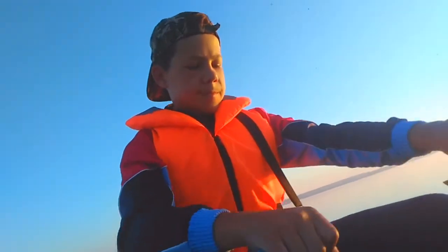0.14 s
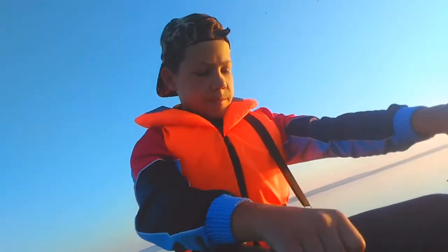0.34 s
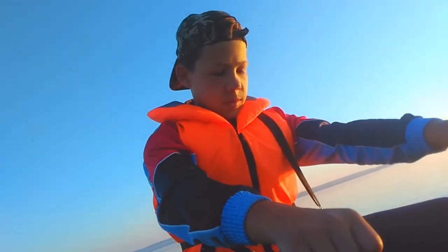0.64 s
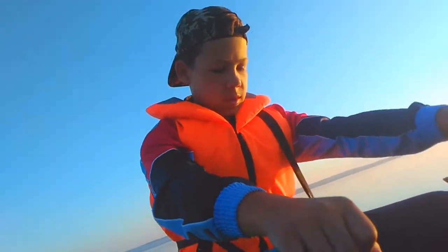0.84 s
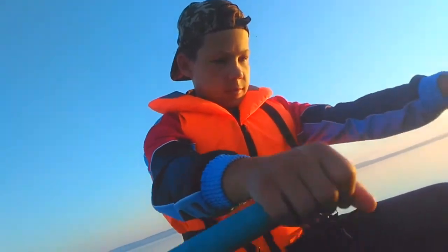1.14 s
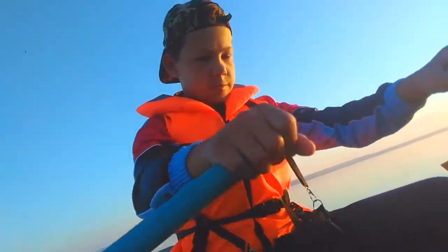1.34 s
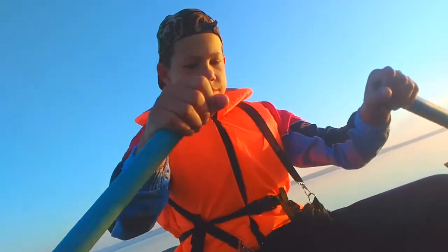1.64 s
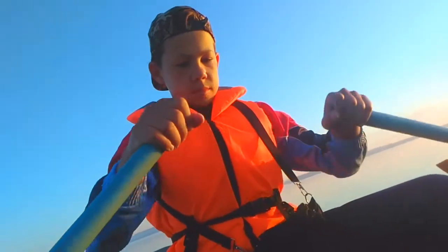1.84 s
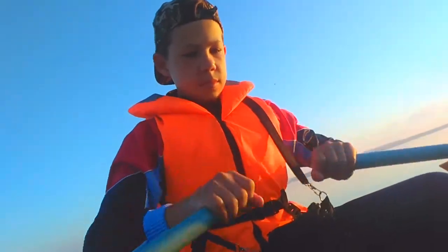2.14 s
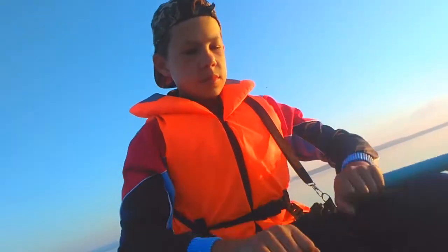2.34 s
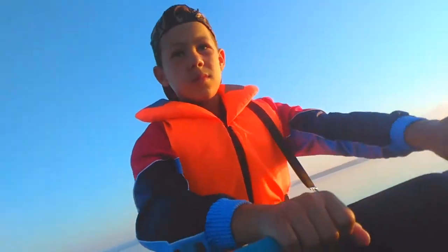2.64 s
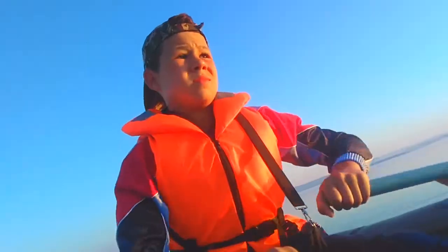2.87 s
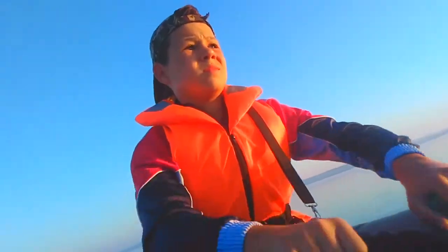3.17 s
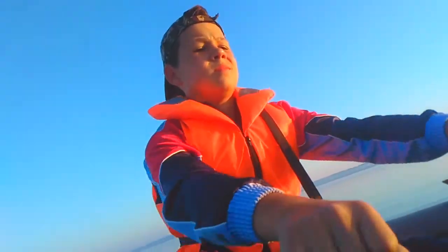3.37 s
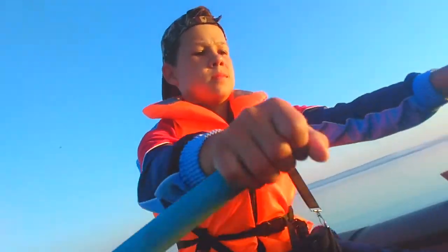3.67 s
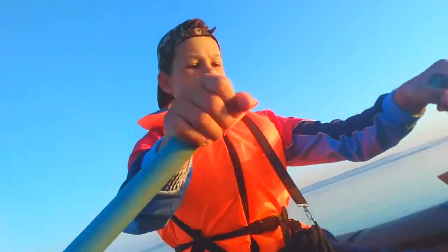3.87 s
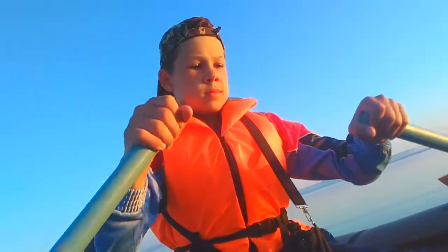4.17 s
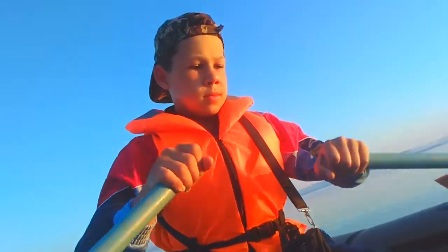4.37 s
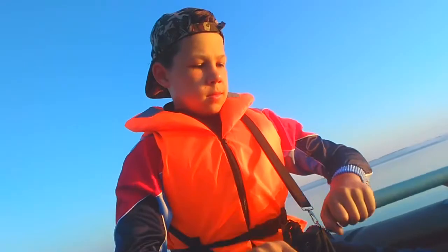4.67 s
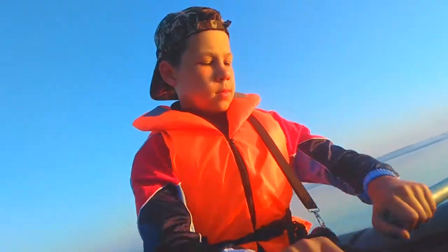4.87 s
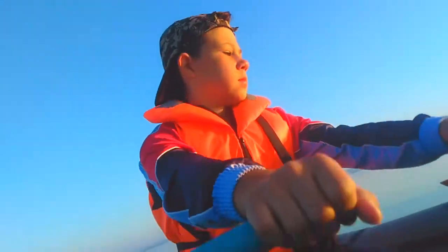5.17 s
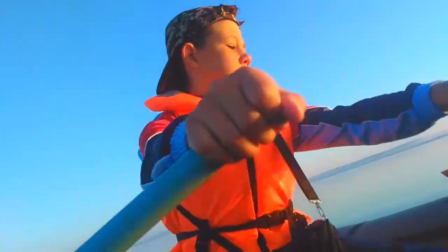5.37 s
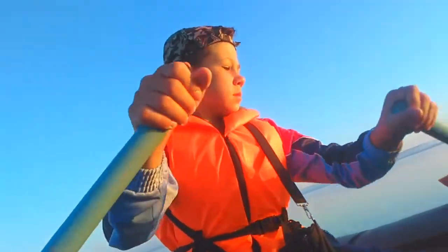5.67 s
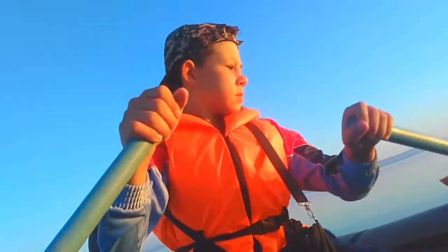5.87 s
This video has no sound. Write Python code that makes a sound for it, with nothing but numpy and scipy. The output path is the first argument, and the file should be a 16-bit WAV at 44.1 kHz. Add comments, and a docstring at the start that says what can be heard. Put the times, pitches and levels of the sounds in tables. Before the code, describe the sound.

Oars pull a small boat across a calm lake, blades splashing and gurgling close by, wooden knocks and faint squeaks between drips and runoff.

```python
"""On a calm lake, in a small rowing boat, heard close to the right oar: the blades splash, spray and churn.
Noise makes the rushing water and swarms of short rising tones its bubbles; drops and slaps are single sounds.
Oar knocks are sums of dying tones, the hull thumps on low tones and squeaks are thin gliding whistles.
A soft noise wash lies behind it all; there are a few dry ticks, and once the level drops almost to silence.
Table levels are relative: later filters and trims also set how loud each sound ends up."""
import sys
import numpy as np
from scipy import signal
from scipy.fft import rfft, irfft, next_fast_len
from scipy.io import wavfile
from scipy.ndimage import uniform_filter1d

SR = 44100
rng = np.random.default_rng(int(sys.argv[2]) if len(sys.argv) > 2 else 0)


def unload_wav(signal):
    """Save mono or channel-first audio to the path in sys.argv[1] as 16-bit WAV at rate SR, clipped to [-1, 1]."""
    wavfile.write(
        sys.argv[1],
        SR,
        np.round(np.clip(np.atleast_2d(signal).T, -1, 1) * 32767).astype(np.int16),
    )


N = 265041
TIME = np.arange(N) / SR
SHORT_TIME = TIME[:SR // 4]   # a quarter of a second, enough for any short burst


def from_db(db):
    """Turn decibels into a gain."""
    return 10 ** (np.asarray(db) / 20)


def rms_one(x):
    """Scale a sound to an rms of 1."""
    return x / np.sqrt(np.mean(x ** 2) + 1e-20)


def curve(rows):
    """Join (time, level) rows by straight lines in dB, as a gain at every sample."""
    return from_db(np.interp(TIME, *np.transpose(rows)))


def add(track, s, sound):
    """Mix a sound into a track at time s; a negative time means the very start."""
    at = max(int(s * SR), 0)
    track[at:at + len(sound)] += sound[:max(N - at, 0)]


def cut(x, hz, kind, order=2):
    """Keep only the low, high or middle band of a sound (Butterworth filter)."""
    safe_hz = np.clip(hz, 10, SR / 2 - 1000)
    sections = signal.butter(order, safe_hz, kind, fs=SR, output="sos")
    return signal.sosfilt(sections, x + 1e-18)


def colour(x, points):
    """Shape the spectrum with a minimum-phase filter, which never sounds ahead of its input."""
    size = 2 * next_fast_len(N // 2 + SR // 4, True)
    hz, db = np.transpose(points)
    bin_hz = np.arange(size // 2 + 1) * SR / size
    shape_db = np.interp(np.log(bin_hz + 1), np.log(hz), db)
    # keeping one half of the cepstrum and doubling it gives the minimum phase
    cepstrum = irfft(np.log(from_db(shape_db)), size)[:size // 2]
    response = np.exp(2 * rfft(cepstrum, size) - cepstrum[0])
    return irfft(rfft(x, size) * response, size)[:N]


def drift(rate):
    """Smooth random wandering with rms 1: straight lines between `rate` random points per second."""
    knots = rng.standard_normal(N // 50)
    return rms_one(np.interp(TIME * rate, np.arange(len(knots)), knots))


def even(x, span_s):
    """Hold the local power near 1 while grains shorter than the span keep their relative sizes."""
    size = max(int(span_s * SR), 2)
    power = uniform_filter1d(uniform_filter1d(x ** 2, size), size)
    return x / np.sqrt(np.abs(power) + np.mean(x ** 2) / 100)


def burst(t60):
    """Noise that starts at rms 1 and falls by 60 dB in t60 seconds."""
    return rng.standard_normal(len(SHORT_TIME)) * 1000 ** (-SHORT_TIME / t60)


def smear(x, echo):
    """Blur a sound with a burst of random reflections, scaled to unit energy."""
    return signal.fftconvolve(x, echo / np.sqrt(np.sum(echo ** 2)))[:N]


def echoes(x, wet_db, t60):
    """Add a short, dense spatter of softened reflections."""
    echo = cut(burst(t60), 3800, "low", order=1) * (1 - np.exp(-SHORT_TIME / 0.0073))
    return x + from_db(wet_db) * smear(x, echo)


def ports(x, left_db, left_lag_s, scatter, blur_hz):
    """Two channels of opposite polarity; the shaded left one hears treble mostly scattered by the boat."""
    scattered = smear(x, burst(0.093))
    direct = np.interp(TIME - left_lag_s, TIME, x)   # a negative lag lets the left lead
    left = cut(direct, blur_hz, "low", order=1) + scatter * cut(scattered, 1100, "high", order=1)
    return np.array([-from_db(left_db) * left, x])


def swell(s, attack, hold, release, db, swell_db_per_s=0):
    """Gain of one rush of water: it rises, reaches its level as the hold ends, then dies away."""
    t = TIME - s
    late = t - attack - hold
    shape_db = np.where(late < 0, swell_db_per_s * late, -60 * late / release)
    return np.clip(t / attack, 0, 1) ** 2 * from_db(db + shape_db)


def together(gains):
    """Unrelated rushes add in power."""
    return np.sqrt(sum(gain ** 2 for gain in gains))


BURST_OCTAVES = 0.83   # a rising bubble bursts around this far above its starting pitch


def bubble(hz, rise, t60, onset_cycles=0.45):
    """A pocket of air rings; its pitch climbs as it nears the surface, or sinks if rise is negative."""
    t = TIME[:int(min(t60, .2) * SR) + 2]
    octaves = np.minimum(rise * t, 2)
    pitch = np.minimum(hz * 2 ** octaves, SR / 3)
    bursting = 1 + np.maximum(octaves / BURST_OCTAVES, 0) ** 8
    decay = 1000 ** (-t / t60) / bursting
    onset = 1 - np.exp(-t * hz / onset_cycles)
    return np.sin(2 * np.pi * np.cumsum(pitch) / SR) * decay * onset


def swarm(count, low_hz, high_hz, cycles, climb, spread_db):
    """Bubbles of random size and strength, each ringing some cycles and climbing by up to some octaves."""
    out = np.zeros(N)
    for when, size, strength, life, lift, side in rng.random((count, 6)):
        hz = low_hz * (high_hz / low_hz) ** size
        t60 = cycles * 2 ** (2 * life - 1) / hz   # half to twice the usual life
        gain = from_db(-spread_db * np.log(strength + 0.0028)) * np.sign(side - .5)
        add(out, when * N / SR, gain * bubble(hz, lift * climb / t60, t60))
    return out


# colour of air and distant ripples: (frequency [Hz], level [dB per Hz])
LAKE_COLOUR = [(15, -34.5), (25, -10.5), (44, -2), (128, 9), (344, -17), (927, -6), (1240, -23.5),
               (2370, -21.5), (5010, -12), (6370, -24), (8100, -58.5), (9020, -28), (10300, -38),
               (15000, -36)]


def lake():
    """A faint wash of air and distant ripples from all around: coloured noise that wavers slightly."""
    near, around = (rms_one(colour(rng.standard_normal(N), LAKE_COLOUR)) for side in range(2))
    wash = ports(near, left_db=-11.0, left_lag_s=0.000009, scatter=3.3, blur_hz=900)
    wash = wash + from_db(-8.5) * around * [[1], [0]]   # extra, separate noise on the left
    return wash * from_db(-55.0 + 2 * drift(24))


# sharp, dry ticks: (time [s], level [dB], lowest frequency [Hz], highest frequency [Hz])
TICKS = [(0.12, -2.5, 5750, 8030), (1.392, -5, 5340, 7800), (2.7669, -23, 100, 14000)]


def tick():
    """Brief clicks, each a tiny noise burst in a band of its own, almost only on the right."""
    out = np.zeros(N)
    for s, db, low_hz, high_hz in TICKS:
        add(out, s, from_db(db) * cut(burst(0.0031), [low_hz, high_hz], "band", order=4))
    return np.array([from_db(-28) * out, out])


# an oar squeaking in its lock:
# (time [s], length [s], level [dB], start pitch [Hz], middle pitch [Hz], end pitch [Hz])
SQUEAKS = [(1.12, 0.075, -48.5, 5460, 5840, 5500), (1.197, 0.032, -36.5, 4700, 5240, 5060),
           (1.222, 0.045, -39, 5230, 5050, 4980), (1.268, 0.018, -38.5, 5200, 5420, 5300),
           (1.487, 0.032, -32.5, 5970, 5650, 4940), (1.546, 0.059, -36, 5760, 5250, 5320),
           (2.095, 0.085, -41.5, 5510, 5460, 5910), (2.13, 0.031, -36, 5050, 4820, 5200),
           (2.205, 0.026, -38, 4700, 5060, 5300), (4.418, 0.14, -65, 4860, 5350, 4620),
           (4.445, 0.022, -48.5, 4960, 5250, 5260), (5.357, 0.035, -43, 3830, 3480, 3860)]


def squeaks():
    """An oar turning in its lock rubs out thin whistles that glide, waver in pitch and flutter in level."""
    out, waver = np.zeros(N), drift(300)
    for s, length, db, start_hz, middle_hz, end_hz in SQUEAKS:
        u = np.linspace(0, 1, int(length * SR))
        glide = np.polyfit([0, .5, 1], [start_hz, middle_hz, end_hz], 2)
        pitch = np.polyval(glide, u) * (1 + 0.016 * waver[int(s * SR):][:len(u)])
        fade = np.abs(np.sin(np.pi * u)) ** .5
        add(out, s, from_db(db) * fade * np.sin(2 * np.pi * np.cumsum(pitch) / SR))
    flutter = from_db(3.5 * drift(200) - 3)
    heard = echoes(out * flutter, wet_db=-8, t60=.18)
    return ports(heard, left_db=-9.5, left_lag_s=.00007, scatter=1.0, blur_hz=9000)


# soft thumps: (time [s], level [dB], pitch [Hz], pitch rise [octaves/s], 60 dB decay [s])
THUMPS = [(0.807, -18, 180, -9, 0.15), (0.826, -11, 103.5, -7, 0.09), (0.986, -14.5, 200, -11, 0.085),
          (1.038, -46, 140, -5, 0.15), (1.244, -32, 169, 4.5, 0.18)]


def hull():
    """The hull gives under the stroke: low tones, most of them sagging in pitch, with a short echo."""
    out = np.zeros(N)
    for s, db, hz, rise, t60 in THUMPS:
        add(out, s, from_db(db) * bubble(hz, rise, t60))
    heard = echoes(out, wet_db=-13.5, t60=0.44)
    return ports(heard, left_db=-14, left_lag_s=-0.00015, scatter=0.33, blur_hz=3000)


# the far blade splashes:
# (time [s], attack [s], hold [s], 60 dB release [s], spray level [dB], wash level [dB])
FAR_SPLASHES = [(-0.03, 0.13, 0.18, 1, -41.5, -47.5), (0.341, 0.024, 0.051, 0.26, -43, -43),
                (0.416, 0.022, 0.022, 2.1, -46.5, -52), (0.69, 0.14, 0.23, 1.06, -47.5, -61),
                (1.415, 0.014, 0.069, 1, -42.5, -61), (2.096, 0.048, 0.11, .4, -48, -74),
                (2.463, 0.094, 0.023, 0.21, -32.5, -70), (3.46, 0.11, 0.2, 0.36, -51, -67.5),
                (3.85, 0.013, 0.065, 0.29, -48, -88), (5.078, 0.13, 0.034, 0.73, -43.5, -76),
                (5.33, 0.033, 0.29, .4, -55.5, -88)]
# colour of the far spray: (frequency [Hz], level [dB per Hz])
FAR_COLOUR = [(600, 10.5), (1500, -25), (3000, -3.5), (5500, 9), (7000, -0.5), (9000, -32), (12000, -45.5)]
# colour of splashing water, far and near: (frequency [Hz], level [dB per Hz])
SPLASH_COLOUR = [(500, -25), (800, -5), (1200, 1), (1700, 5), (2400, 6.5), (3300, -1), (5000, -55)]


def far_spray():
    """The far blade fizzes and washes: small bubbles blurred into noise, direct on the left."""
    fizz = swarm(count=4000, low_hz=800, high_hz=8000, cycles=20, climb=.3, spread_db=3.5)
    water = rms_one(cut(fizz, 3000, "high", order=1)) + from_db(-2) * rng.standard_normal(N)
    spray_level = together(swell(*shape, db) for *shape, db, _ in FAR_SPLASHES)
    wash_level = together(swell(*shape, db) for *shape, _, db in FAR_SPLASHES)
    sound = from_db(-6.0) * spray_level * even(colour(water, FAR_COLOUR), span_s=0.043)
    sound += wash_level * even(colour(water, SPLASH_COLOUR), span_s=0.055)
    heard = ports(sound, left_db=3.5, left_lag_s=0.0002, scatter=1.0, blur_hz=1500)
    return heard[::-1]   # swap sides: here the right is the shaded one


# a deep blade sheds a smooth, hollow swirl:
# (time [s], attack [s], hold [s], 60 dB release [s], level [dB])
SWIRLS = [(0.131, 0.023, 0.074, 0.21, -35), (0.343, 0.023, 0.065, 0.17, -33.5),
          (3.519, 0.04, 0.19, 0.16, -45.5), (3.621, 0.01, 0.022, 0.21, -36.5),
          (5.69, 0.022, 0.12, 0.22, -35)]
# the hollow of the swirl: (frequency [Hz], width [Hz], level [dB])
SWIRL_RESONANCES = [(135, 55, -6.5), (336, 95, 3.5), (452, 67, -4.5), (700, 200, -10.5), (977, 57, -11.5)]


def swirl():
    """Turbulence round a sunken blade sounds the hollow that it drags along: noise in a few narrow bands."""
    flow, hollow = rng.standard_normal(N), np.zeros(N)
    for hz, width, db in SWIRL_RESONANCES:
        band = cut(flow, [hz - width / 2, hz + width / 2], "band")
        hollow += from_db(db) * rms_one(band)
    level = together(swell(*row) for row in SWIRLS)
    sound = level * even(cut(hollow, 1200, "low", order=4), span_s=0.03)
    return ports(from_db(5.5) * sound, left_db=-9, left_lag_s=-0.00017, scatter=1.0, blur_hz=3000)


# a blade pushes water aside, with more bass the deeper it goes:
# (time [s], attack [s], hold [s], 60 dB release [s], gurgle level [dB], bass level [dB])
SURGES = [(0.082, 0.079, 0.026, 0.63, -22, -32.5), (0.271, 0.063, 0.079, 0.4, -23, -30),
          (0.386, 0.005, 0.06, 0.38, -18, -36), (0.488, 0.027, 0.016, 0.38, -23.5, -34.5),
          (0.726, 0.01, 0.32, 0.25, -36, -71), (0.979, 0.057, 0.015, 0.22, -46, -26),
          (1.215, 0.023, 0.043, 0.36, -44, -40), (1.452, 0.013, 0.028, 0.12, -18.5, -63),
          (1.542, 0.027, 0.064, 0.22, -33, -65), (1.667, 0.009, 0.0095, 0.66, -27, -30),
          (1.828, 0.015, 0.0077, 0.44, -25, -54), (2.469, 0.012, 0.011, 0.4, -27.5, -26.5),
          (2.59, 0.011, 0.0085, 0.08, -43, -26), (3.142, 0.14, 0.16, 0.18, -43.5, -56),
          (3.534, 0.069, 0.17, 0.36, -47, -39.5), (3.983, 0.021, 0.0094, 0.29, -63, -40),
          (4.114, 0.054, 0.022, 0.4, -27.5, -49), (5.588, 0.02, .02, 0.47, -32, -40),
          (5.678, 0.02, 0.044, 0.29, -23, -46), (5.745, 0.047, 0.078, 0.31, -32, -31.5)]
# colour of the churned water: (frequency [Hz], level [dB per Hz])
CHURN_COLOUR = [(40, -50.5), (70, 17), (130, 4.5), (220, -2.5), (370, -5.5), (600, -6), (900, -10),
                (1300, -14), (2500, -57.5)]
# between strokes the water laps at the hull
LAP_DB, LAP_BASS_DB, LAP_SWING_DB = -52, -57, 7


def churn():
    """The blades drag big air pockets under: low bubbles gurgle in turbulent, noisy water."""
    pockets = swarm(count=2400, low_hz=125.6, high_hz=1390, cycles=22.2, climb=0.33, spread_db=3.5)
    water = rms_one(cut(pockets, 260, "high", order=1)) + from_db(2) * rng.standard_normal(N)
    water = even(colour(water, CHURN_COLOUR), span_s=0.017)
    lap_db = LAP_SWING_DB * drift(7)
    gurgle_rushes = [swell(*shape, db) for *shape, db, _ in SURGES]
    bass_rushes = [swell(*shape, db) for *shape, _, db in SURGES]
    gurgle = together(gurgle_rushes + [from_db(LAP_DB + lap_db)])
    bass = together(bass_rushes + [from_db(LAP_BASS_DB + lap_db)])
    sound = gurgle * cut(water, 377, "high") - bass * cut(water, 247, "low")
    return ports(sound, left_db=-7, left_lag_s=-0.00031, scatter=0.87, blur_hz=2990)


NEAR_BLADE_LAG_S = 0.00035   # sound from the near blade reaches the left this much later
MIST_DB, TRICKLE_DB = -67, -62.5   # the fizz and the trickle that linger between splashes
RUNOFF_ATTACK_S, RUNOFF_RELEASE_S, SPLASH_ATTACK_S = 0.017, 0.38, 0.016
SPLASH_SWELL_DB_PER_S, SPRAY_SWELL_DB_PER_S = 20.5, 48   # the stream breaks into ever finer drops
# a lifted blade streams and drips, for spray() and splash():
# (time [s], length [s], final splash level [dB], final spray level [dB])
RUNOFFS = [(-0.02, 0.2, -29.5, -33.5), (1.541, 0.17, -31.5, -34.5), (2.116, 0.45, -27, -30.5),
           (2.785, 0.43, -29.5, -35.5), (3.899, 0.18, -40.5, -42), (4.625, 0.11, -37.5, -45.5),
           (4.763, 0.11, -32.5, -40.5), (4.889, 0.12, -36.5, -32)]
# the near blade throws short splashes, for spray() and splash():
# (time [s], hold [s], 60 dB release [s], splash level [dB], spray level [dB])
SPLASHES = [(-0.02, 0.016, 0.27, -28, -33.5), (0.137, 0.032, 0.3, -25.5, -47),
            (0.379, 0.06, 0.32, -33, -39), (0.561, 0.092, 0.9, -47, -50.5), (1.029, 0.02, 0.28, -45, -45.5),
            (1.337, 0.091, 0.16, -70, -48.5), (1.449, 0.018, 0.2, -36, -35),
            (1.777, 0.017, 0.087, -23.5, -33.5), (1.842, 0.024, 0.18, -35.5, -46),
            (1.929, 0.14, 0.23, -50, -55.5), (2.455, 0.02, 0.099, -42, -37),
            (2.827, 0.069, 0.073, -58, -42.5), (3.181, 0.095, 0.32, -49, -31.5),
            (3.362, 0.0096, 0.56, -46.5, -44), (4.153, 0.016, 0.21, -38, -37),
            (4.289, 0.015, 0.35, -49, -81), (5.072, 0.0071, 0.48, -37, -35),
            (5.315, 0.072, 0.051, -82, -44.5), (5.509, 0.037, 0.27, -47.5, -38.5),
            (5.562, 0.069, 0.13, -33.5, -30), (5.677, 0.026, 0.63, -38, -42.5),
            (5.792, 0.041, 0.063, -43.5, -46.5)]
# colour of the fine spray: (frequency [Hz], level [dB per Hz])
SPRAY_COLOUR = [(1800, -32), (2800, -4.5), (4200, 0.5), (5600, 2.5), (6800, 3), (8000, -3.5), (9300, -8),
                (11000, -97), (15000, -45)]


def spray():
    """Fine droplets and tiny bubbles fizz densely; as the spray thins only a smooth hiss is left."""
    fizz = swarm(count=6500, low_hz=2500, high_hz=8500, cycles=38, climb=.3, spread_db=4.2)
    rushes = [from_db(MIST_DB)]
    for s, length, _, db in RUNOFFS:
        rushes.append(swell(s, RUNOFF_ATTACK_S, length, RUNOFF_RELEASE_S, db, SPRAY_SWELL_DB_PER_S))
    for s, hold, release, _, db in SPLASHES:
        rushes.append(swell(s, SPLASH_ATTACK_S, hold, release, db))
    level = together(rushes)
    graininess = level / (level + from_db(-54))
    water = graininess * rms_one(fizz) + from_db(-5) * rng.standard_normal(N)
    clumps = from_db(2.5 * graininess * drift(90))
    sound = from_db(-1.5) * level * clumps * even(colour(water, SPRAY_COLOUR), span_s=0.025)
    return ports(sound, left_db=-20.5, left_lag_s=NEAR_BLADE_LAG_S, scatter=0.47, blur_hz=3000)


def splash():
    """Water off the near blade traps bubbles that chirp upwards; a thrown splash blurs them into a wash."""
    drops = swarm(count=5200, low_hz=600, high_hz=3400, cycles=38, climb=.55, spread_db=4.0)
    stream = together([swell(s, RUNOFF_ATTACK_S, length, RUNOFF_RELEASE_S, db, SPLASH_SWELL_DB_PER_S)
                       for s, length, db, _ in RUNOFFS])
    thrown = together([swell(s, SPLASH_ATTACK_S, hold, release, db) for s, hold, release, db, _ in SPLASHES])
    trickle = from_db(TRICKLE_DB)
    level = together([stream, thrown, trickle])
    graininess = together([stream, thrown / 2, trickle]) / (level + from_db(-58))
    wash = from_db(-4.5) * rng.standard_normal(N) * from_db(3.2 * drift(260))
    water = graininess * rms_one(cut(drops, 1200, "high", order=1)) + wash
    sound = from_db(-3.0) * level * even(colour(water, SPLASH_COLOUR), span_s=0.027)
    return ports(sound, left_db=-16.5, left_lag_s=NEAR_BLADE_LAG_S, scatter=0.68, blur_hz=4440)


# an oar knocks in its lock: (time [s], body level [dB], metallic top level [dB],
# top ring time [times the mode's], top pitch [times the mode's])
KNOCKS = [(0.962, -11, -14, 1.8, 0.74), (1.0131, -4.5, -3, 1.01, 0.99), (1.6734, -6, 5, 1.26, .995)]
# ringing modes of oar and lock: (frequency [Hz], level [dB], 60 dB decay [s])
OAR_MODES = [(328, -8, 0.05), (660, -3, 0.035), (785, -8.5, 0.024), (875, -11.5, 0.09), (1157, -19, 0.0099),
             (1382, 4, 0.014), (1622, -2, 0.019), (1785, -3.5, 0.028), (3336, -12.5, 0.0094),
             (3590, -17, 0.036), (4494, -2.5, 0.014), (5294, -11.5, 0.026), (6010, -3.5, 0.0066),
             (6690, -6, 0.0049), (6740, -26.5, 0.011), (7800, -23.5, 0.007)]


def oarlocks():
    """A hard knock rings the shaft's low modes and the lock's high ones, with a crack and a dull hull tail."""
    out = np.zeros(N)
    for s, body_db, top_db, top_ring, top_pitch in KNOCKS:
        for k, (hz, level_db, t60) in enumerate(OAR_MODES):
            if hz < 2600:   # the shaft
                db, life, pitch = body_db, t60, hz
            else:           # the lock
                db, life, pitch = top_db, t60 * top_ring, hz * top_pitch
            ring = np.sin(2 * np.pi * pitch * SHORT_TIME) * from_db(-60 * SHORT_TIME / life)
            add(out, s, (-1) ** k * from_db(db + level_db) * ring)
        crack = cut(burst(.022 * top_ring), [3300 * top_pitch, 6700 * top_pitch], "band", order=5)
        thud = cut(burst(.02), [600, 1900], "band")
        tail = cut(burst(.1), [200, 1900], "band")
        add(out, s, from_db(top_db - 4.5) * crack)
        add(out, s, from_db(body_db + 9.0) * thud)
        add(out, s, from_db(body_db - 3.0) * tail)
    soft_top = cut(out, 8000, "low", order=3)
    return ports(soft_top, left_db=-6.5, left_lag_s=-0.00026, scatter=0.22, blur_hz=4000)


SPLAT_ONSET_S = .0012


def splat(t60):
    """Water meeting water: noise that swells for an instant and dies away."""
    return burst(t60) * (1 - np.exp(-SHORT_TIME / SPLAT_ONSET_S))


DRIP_RISE_OCTAVES_PER_S, DRIP_RISE_SPREAD_OCTAVES_PER_S = 8, 6
DRIP_IMPACT_DB, DRIP_IMPACT_T60_S = -0.5, 0.012   # the splat as a drop lands, level relative to its ring
BUBBLE_FLUTTER_DB = 2.2   # moving water jostles the ringing bubbles
# hull, rower and water scatter each sound into a brief spatter
SPATTER_DB, SPATTER_ONSET_S, SPATTER_T60_S = -7, 0.0048, 0.041
# air pockets large and small glug, chirp and plink:
# (time [s], level [dB], pitch [Hz], pitch rise [octaves/s], 60 dB decay [s])
BUBBLES = [(0.155, -17.5, 384.7, 0, 0.22), (0.3564, -14, 564, 10, 0.031), (0.48, -20.5, 984, 4.5, 0.13),
           (0.517, -16, 634, 5.5, 0.07), (0.5485, -15.5, 395, -10, 0.07), (0.712, -27, 522, -13, 0.085),
           (1.4129, -25.5, 885, 40.5, 0.069), (1.463, -23.5, 436, 1, 0.14), (1.47, -23.5, 636, -0.5, 0.18),
           (1.606, -26.5, 384, -5, 0.22), (1.8361, -5, 483, -2, 0.069), (1.861, -18.5, 449, 15.5, 0.092),
           (0.269, -27.5, 1555, -8.5, 0.15), (0.58, -35.5, 1434, 2, 0.2), (0.58, -27, 740, 0, 0.065),
           (0.519, -24.5, 1380, -9, 0.054), (1.905, -26.5, 2780, 13, 0.027), (2.425, -22, 3740, 23, .015),
           (2.54, -22.5, 724, -3, 0.088), (3.181, -22, 2330, 8, .025), (4.598, -27.5, 2590, 1, 0.026),
           (4.719, -30, 3320, 11, 0.029), (5.154, -31, 845, 9, 0.035), (5.891, -34, 1900, -7, 0.057),
           (1.893, -24, 732, 24, 0.15), (2.1518, -18.5, 1048, 31, 0.041), (2.334, -27, 585, 3, 0.2),
           (2.601, -12, 360, -8.5, 0.048), (2.808, -32, 684, 29, 0.025), (2.936, -35.5, 680, 18.5, 0.2),
           (3.006, -30, 1374, 17.5, 0.042), (2.945, -37.5, 444, 7, 0.69), (3.11, -32.5, 620, 12.5, 0.084),
           (3.2379, -19, 1108, 18.5, 0.074), (3.291, -23.5, 1046, 8.5, 0.067),
           (3.919, -34.5, 824, -3, 0.055), (4.07, -33, 830, 4.5, 0.054), (4.146, -28, 363, -2.5, 0.24),
           (4.171, -24, 325, 0, 0.17), (4.2084, -21.5, 285, 0, 0.23), (4.258, -16, 360, 5, 0.046),
           (4.259, -15.5, 586, 21.5, 0.12), (4.576, -22, 658, 39, 0.078), (4.596, -25, 510, 22.5, 0.13),
           (4.815, -32, 596, 12, 0.17), (4.9234, -27, 1078, 7.5, 0.22), (5.5818, -22, 1125, 50, 0.28),
           (5.698, -20.5, 335, 6, 0.17), (5.715, -26, 789, -1.5, 0.15), (5.798, -21, 1113, -6.5, 0.029),
           (5.807, -20, 240, -1.5, 0.16), (5.838, -21.5, 375, -3.5, 0.14), (5.878, -26.5, 656, 33, 0.045),
           (5.8807, -23, 920, 17, 0.076)]
# the loudest drops plink: (time [s], level [dB], pitch [Hz], 60 dB decay [s])
DRIPS = [(0.009, -15.5, 3520, 0.0081), (0.0189, -15.5, 2130, 0.017), (0.0504, -18, 1780, 0.064),
         (0.058, -19, 1233, 0.091), (0.077, -19, 2910, 0.036), (0.125, -8.5, 2320, 0.0078),
         (0.19, -17, 2600, 0.019), (0.2018, -12, 1560, 0.016), (0.264, -18.5, 5600, 0.013),
         (0.351, -21, 2490, 0.011), (0.389, -9, 1630, 0.014), (0.4823, -13.5, 4740, 0.012),
         (1.597, -17, 1440, 0.031), (1.735, -15, 1170, 0.035), (1.7883, -3, 1060, 0.0097),
         (1.8023, -19, 6400, 0.015), (2.1098, -22, 2355, 0.021), (2.1801, -14, 2900, 0.026),
         (2.1993, -10, 3100, 0.0096), (2.217, -21.5, 970, 0.043), (2.267, -14.5, 1680, 0.027),
         (2.2773, -19.5, 974, 0.051), (2.294, -18.5, 5600, 0.0061), (2.327, -20.5, 1450, 0.048),
         (2.328, -16, 6730, 0.0055), (2.3769, -17.5, 1740, 0.033), (2.413, -17, 2700, 0.029),
         (2.471, -8.5, 4360, 0.01), (2.487, -11, 3020, 0.014), (2.516, -18.5, 1142, 0.039),
         (2.5466, -21, 3260, 0.012), (2.558, -17.5, 1830, 0.035), (2.582, -16, 1243, 0.055),
         (2.589, -8, 3620, 0.0082), (2.6465, -24, 1830, 0.038), (2.8153, -24, 1535, 0.049),
         (2.838, -23, 5140, 0.01), (2.848, -16.5, 2470, 0.018), (2.882, -24, 2800, 0.018),
         (2.9363, -22, 1940, 0.0075), (2.9802, -21, 2050, 0.022), (2.982, -15.5, 3980, 0.0081),
         (3.026, -26, 700, 0.027), (3.062, -21.5, 1790, 0.035), (3.092, -12, 2285, 0.022),
         (3.172, -18, 4000, 0.01), (3.196, -26, 1060, 0.033), (3.2153, -15, 2580, 0.019),
         (3.222, -20.5, 1140, 0.03), (3.239, -13.5, 6200, 0.0045), (3.2844, -8.5, 7320.0, 0.0068),
         (3.3125, -13.5, 5840, 0.0069), (3.34, -34, 1680, 0.027), (3.382, -25, 2340, 0.04),
         (3.5987, -25, 5530, 0.014), (3.8704, -21, 3980, 0.0084), (3.999, -19.5, 2390, 0.013),
         (4.039, -11, 4610, 0.012), (4.1475, -22.5, 1440, 0.042), (4.1865, -18, 1480, 0.01),
         (4.566, -29.5, 5630, 0.011), (4.6064, -26.5, 5940, 0.0096), (4.661, -24, 3800, 0.0072),
         (4.783, -11, 1730, 0.004), (4.7937, -13, 1665, 0.015), (4.8141, -17, 1780, 0.016),
         (4.8319, -14, 1217, 0.021), (4.92, -12.5, 5670, 0.0063), (4.9484, -11, 1630, 0.011),
         (4.978, -14, 1990, 0.015), (4.981, -13, 4460, 0.009), (5.0215, -23, 5990.0, 0.015),
         (5.024, -17, 2490, 0.012), (5.1025, -17, 1710, 0.019), (5.1193, -9.5, 4700, 0.0063),
         (5.1445, -24.5, 2080, 0.016), (5.1837, -26.5, 2810, 0.02), (5.248, -31, 4450, 0.012),
         (5.502, -27.5, 3630, 0.027), (5.531, -30, 2080, 0.027), (5.558, -28, 1540, 0.023),
         (5.588, -6, 6800, 0.003), (5.592, -8.5, 2020, 0.013), (5.604, -11.5, 1630, 0.018),
         (5.6056, -13, 5700, 0.0097), (5.6246, -17, 1290.0, 0.014), (5.7368, -23, 2140, 0.017),
         (5.817, -23.5, 3560, 0.009)]
# water slaps on water: (time [s], body level [dB], spray level [dB])
SLAPS = [(0.0501, -25, -29), (0.201, -17, -46), (0.3883, -5.5, -29), (1.471, -28, -41), (1.787, -22, -45),
         (1.8368, -14, -18), (2.268, -11, -24.5), (2.6095, -7.5, -14.5), (2.979, -20, -21.5),
         (3.218, -24, -14), (3.2395, -26, -15.5), (3.3749, -26, -22), (4.146, -20, -36), (4.1754, -14, -50),
         (4.597, -24, -41), (4.8341, -13, -49), (4.9807, -12, -12.5), (5.5867, -19, -28),
         (5.6261, -12, -33), (5.8802, -49, -32)]


def plops():
    """Single bubbles ring, drops strike the surface and ring, and water slaps wetly beside the near blade."""
    rings, slaps = np.zeros(N), np.zeros(N)
    for s, db, hz, rise, t60 in BUBBLES:
        add(rings, s, from_db(db) * bubble(hz, rise, t60))
    for (s, db, hz, t60), lift in zip(DRIPS, rng.standard_normal(len(DRIPS))):
        impact = cut(splat(DRIP_IMPACT_T60_S), [hz / 1.6, hz * 1.6], "band")
        rise = DRIP_RISE_OCTAVES_PER_S + DRIP_RISE_SPREAD_OCTAVES_PER_S * lift
        add(rings, s, from_db(db) * bubble(hz, rise, t60))
        add(rings, s, from_db(db + DRIP_IMPACT_DB) * impact)
    for s, body_db, spray_db in SLAPS:
        body = cut(splat(0.0089), [700, 2800], "band", order=3)
        fine_spray = cut(splat(0.0061), [2800, 6600], "band", order=5)
        add(slaps, s, from_db(body_db + 8.5) * body)
        add(slaps, s, from_db(spray_db + 15.5) * fine_spray)
    jostle = from_db(BUBBLE_FLUTTER_DB * drift(320))
    sound = from_db(-1.0) * jostle * cut(rings, 6900, "low", order=4) + slaps
    spatter = burst(SPATTER_T60_S) * (1 - np.exp(-SHORT_TIME / SPATTER_ONSET_S))
    sound = sound + from_db(SPATTER_DB) * smear(cut(sound, 790, "high"), spatter)
    return ports(sound, left_db=-15.0, left_lag_s=NEAR_BLADE_LAG_S, scatter=0.78, blur_hz=5000)


# all but the ticks sinks almost to silence, then jumps back a little louder and stays there:
# (time [s], level [dB])
DIP = [(2.66, -3), (2.71, -11), (2.745, -29.5), (2.763, -84), (2.766, 2.5)]


def scene():
    """Surroundings, boat and water share one level curve; the ticks are added on top."""
    boat = squeaks() + hull() + oarlocks()
    water = far_spray() + swirl() + churn() + spray() + splash() + plops()
    return (lake() + boat + water) * curve(DIP) + tick()


TOP_HZ = 15500


def record(dry):
    """Peaks beyond full level overload and are clipped flat; then the top of the treble is cut."""
    return cut(np.clip(dry, -1, 1), TOP_HZ, "low", order=14)


dry = scene()
out = record(dry)
unload_wav(out)
```